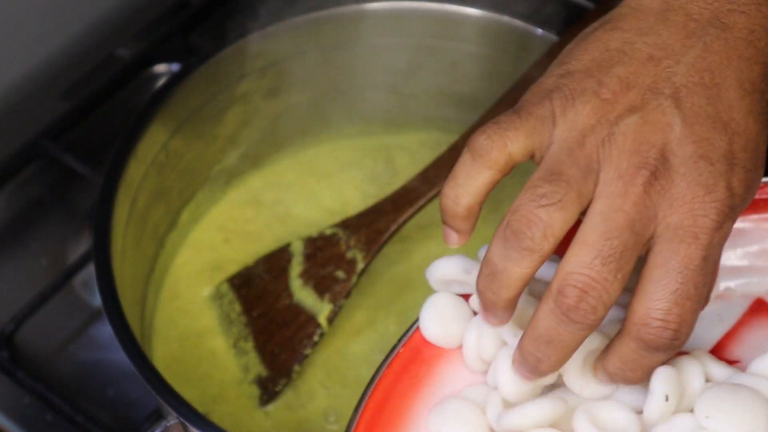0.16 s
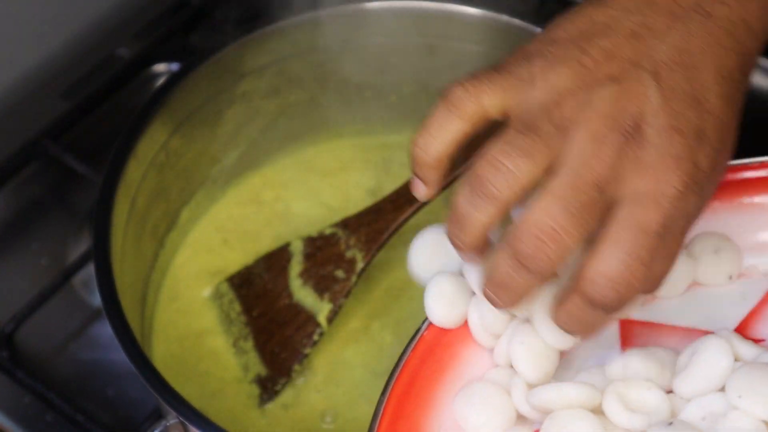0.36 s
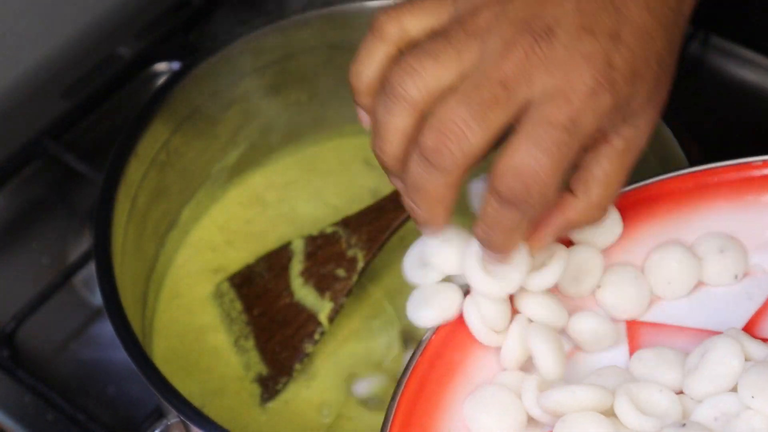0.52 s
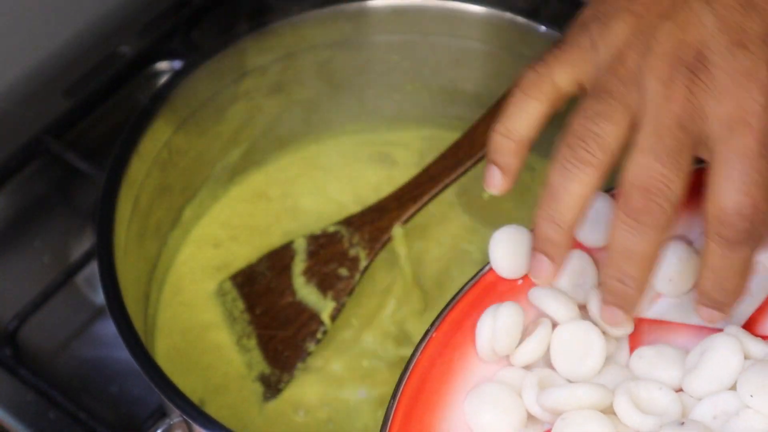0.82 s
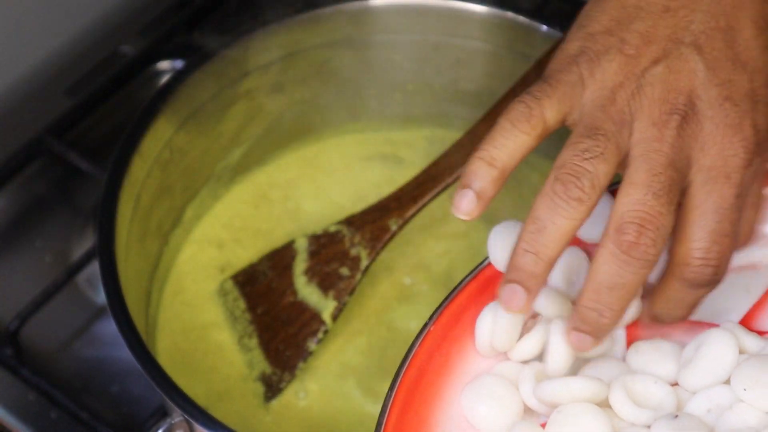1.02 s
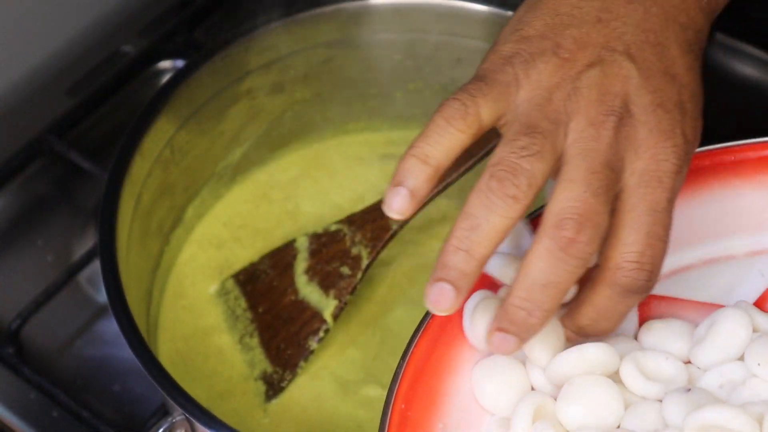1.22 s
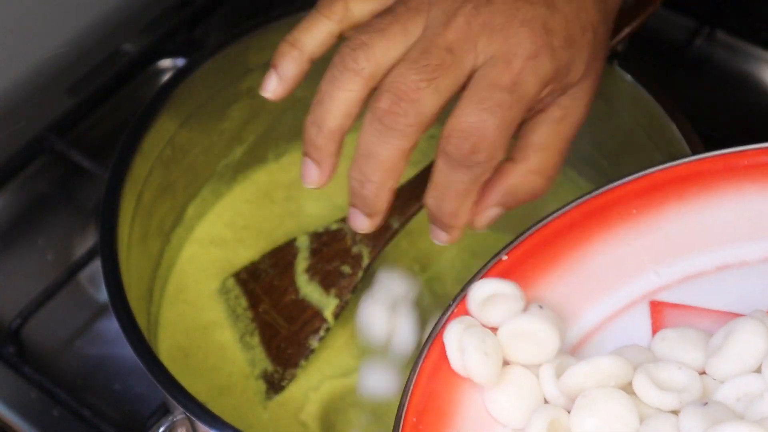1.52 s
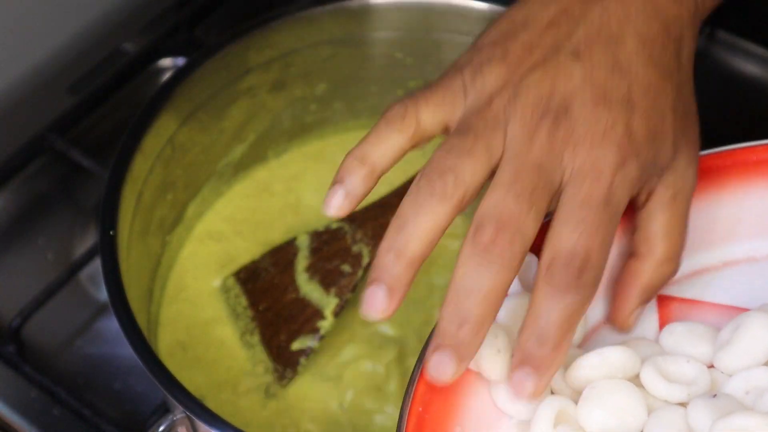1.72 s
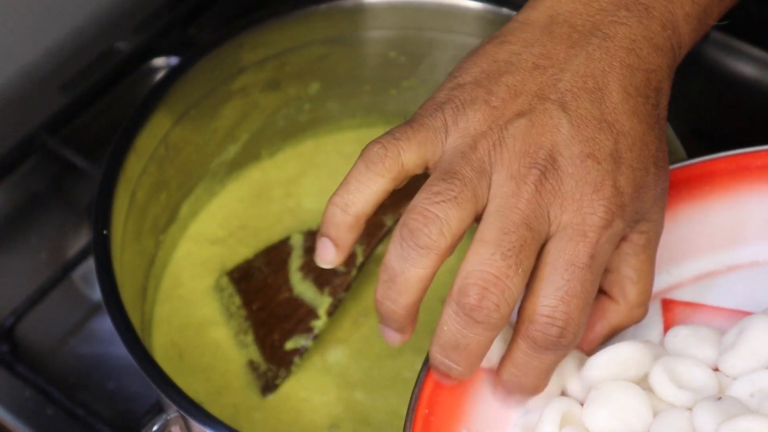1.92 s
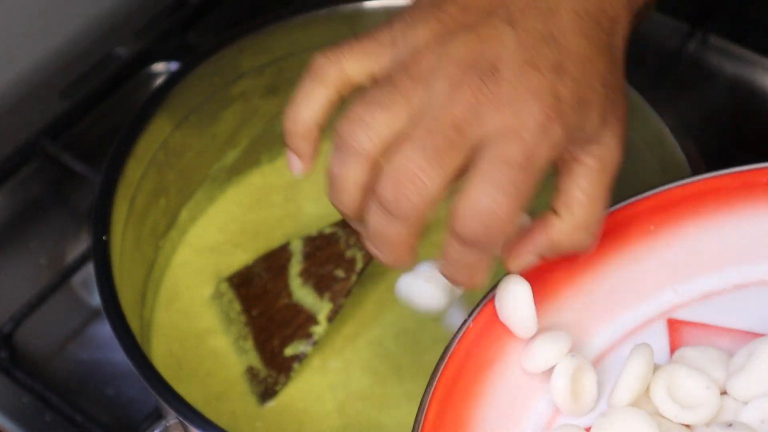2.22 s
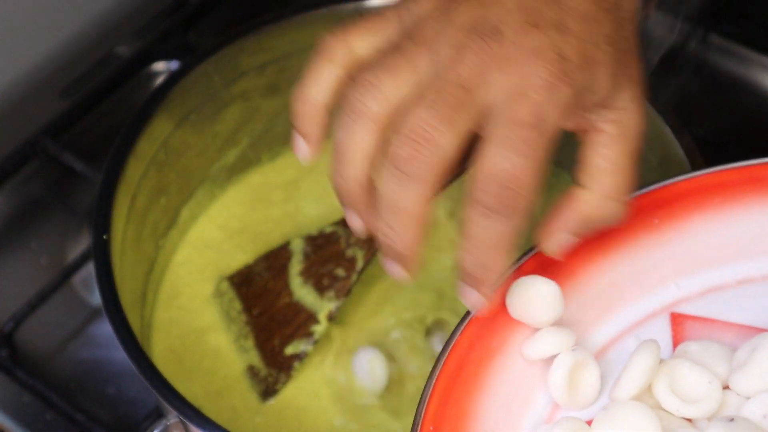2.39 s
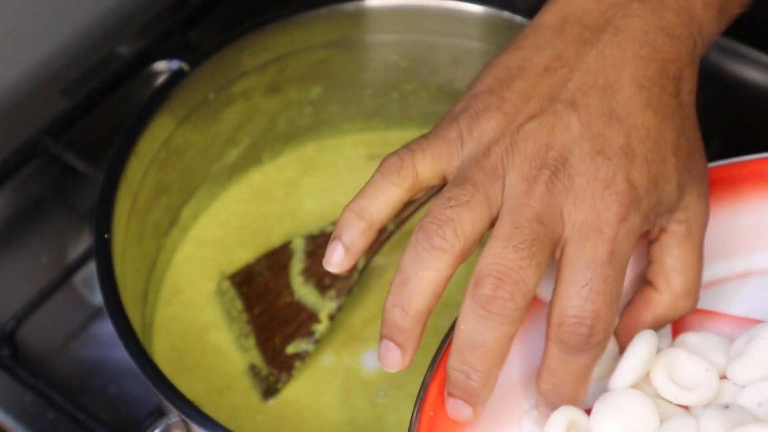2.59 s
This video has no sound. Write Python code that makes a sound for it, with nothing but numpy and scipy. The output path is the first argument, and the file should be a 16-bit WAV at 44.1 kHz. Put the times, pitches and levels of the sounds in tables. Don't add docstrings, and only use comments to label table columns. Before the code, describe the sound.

Small dough balls splash and plop into a simmering pot over a steady gas burner hiss

```python
import sys
import numpy as np
from scipy import signal
from scipy.fft import rfft, irfft, next_fast_len
from scipy.io import wavfile
from scipy.ndimage import uniform_filter1d

SR = 44100
rng = np.random.default_rng(int(sys.argv[2]) if len(sys.argv) > 2 else 0)


def wrap_up_sound(samples):
    columns = np.atleast_2d(samples).T
    tamed = np.clip(columns, -1, 1)
    steps = np.round(tamed * 32767).astype(np.int16)
    wavfile.write(sys.argv[1], SR, steps)


def how_loud(loudness_db):
    steps = np.asarray(loudness_db, float) / 20
    return 10 ** steps


N = 121275

# frequency in Hz, level in dB per Hz.
FLAME_SPECTRUM = [(15, -18), (40, -5.5), (200, -8.5), (370, -10.5), (1500, -12.5), (1750, -19.5),
                  (7000, -23), (8500, -26.5)]
# frequency in Hz, level in dB per Hz.
HISS_SPECTRUM = [(8500, -26), (12500, -28.5), (16500, -36)]
# frequency in Hz, width in Hz, lift in dB.
POT_BANDS = [(73.5, 50, 6.5), (159.6, 26, 5.5), (450, 21.3, 7.5), (528, 49, 5), (1336, 33, 5.5),
             (1570, 360, -3), (1566, 28, 7.5)]
# frequency in Hz, width in Hz, lift in dB.
JET_BANDS = [(2920, 150, 5), (5030, 100, 8), (5250, 90, 4), (6900, 220, 6), (9800, 100, 6), (11900, 150, 4),
             (12350, 120, 5)]
# frequency in Hz, level in dB, time to fade by 60 dB in seconds,
# direction of the first swing (1 or -1).
TRAY_TONES = [(300, -5.5, .06, -1), (445, -2, .034, -1), (523, -3, .039, 1), (715, -11, .06, 1),
              (799, 2.5, .022, 1), (942, 1, .024, -1), (1222, -3.5, .012, -1), (2190, -15.5, 0.023, 1),
              (3550, -21, .07, 1), (5600, -16, 0.034, 1)]
# start in seconds, peak in dB, pitch in Hz.
PLOPS = [(.406, -46, 530), (.479, -48, 503), (.541, -39, 496), (0.6335, -34, 530), (.688, -39, 476),
         (0.748, -27.5, 483), (0.807, -31, 470), (0.854, -28.5, 536), (0.919, -40, 434), (1.015, -31, 450),
         (1.054, -38, 530), (1.163, -36.5, 528), (1.24, -39, 600), (1.33, -40, 476), (1.576, -32, 464),
         (1.594, -31, 494), (1.668, -31, 540), (1.6755, -24.5, 540) , (1.764, -35, 532), (1.812, -41, 510),
         (1.935, -32.5, 485), (2.002, -32, 526), (2.081, -32, 450),
         (2.148, -31.5, 520) , (2.241, -35.5, 506), (2.294, -42, 440), (2.323, -42, 515), (2.405, -35, 437),
         (2.442, -32, 507), (2.453, -40, 450), (2.472, -35, 436), (2.493, -35, 490), (2.498, -33.5, 520)]
# start in seconds, length in seconds, level in dB, pitch in Hz.
WHISTLES = [
    (1.9, 0.057, -52, 1540),
    (1.7, 0.063, -57, 1200),
    (2.21, 0.057, -59, 1400),
    (2.53, .16, -54.5, 1560),
    (2.64, 0.051, -52, 1300),
    (1.04, .12, -57, 1560),
    (.42, 0.098, -57.5, 1500),
]
# start in seconds, peak in dB, spray pitch in Hz, spray fade in seconds.
SPLASHES = [(0.467, -30, 5850, .004), (.587, -28, 5460, 0.0044), (0.597, -35, 2340, 0.0031),
            (0.609, -27, 6780, 0.0065), (0.635, -27, 5850, .007), (0.661, -30.5, 5600, .008),
            (0.748, -26, 6040, 0.0036), (0.776, -30, 6000, 0.0093), (0.791, -24.5, 4000, 0.0075),
            (0.81, -19, 6000, 0.0075), (0.8555, -21, 4000, 0.0067), (.874, -25.5, 4130, 0.0043),
            (0.887, -33, 5240, 0.0074), (1.454, -28.5, 7400, .007), (1.494, -27, 5690, .006),
            (1.52, -29.5, 7200, 0.0068), (1.579, -23, 6280, 0.0055), (1.597, -29.5, 4870, .005),
            (1.629, -25.5, 8600, 0.008), (1.669, -25, 6800, 0.0084), (1.677, -21.5, 5400, 0.014),
            (1.727, -33, 4380, 0.0033), (1.76, -32, 2420, .004), (1.766, -25, 8430, 0.0043),
            (1.817, -26.5, 4410, 0.0062), (2.08, -35.5, 1905, .004), (2.398, -33.5, 4320, 0.005),
            (2.4416, -18, 5760, 0.0077), (2.615, -27, 6560, .005)]
# frequency in Hz, gain in dB.
SOFT_TOP = [(6500, -0.5), (8500, 1.5), (12000, -2.5), (15000, -5)]
ROLL_STARTS = [.58, .70, .86, .93, 1.02, 1.04, 1.112, 1.153, 1.95, 2.43, 2.44, 2.54, 2.68]
# length in seconds, level in dB, pitch in Hz.
ROLLS = [(0.11, -49, 2400), (0.029, -54.5, 3000), (0.074, -46.5, 4500), (0.087, -50, 4970),
         (.13, -46.5, 680), (0.11, -47.5, 5060), (0.029, -43.5, 4400), (.015, -48, 5440),
         (0.059, -50, 3500), (.1, -41, 4950), (0.055, -54, 2100), (0.078, -47, 6230), (.05, -51, 9200)]
# frequency in Hz, width in Hz, lift in dB.
TRAY_BANDS = [(2800, 630, 0), (3440, 120, 4.5), (4400, 460, 3), (5240, 120, -1.5), (5400, 130, 8),
              (6730, 73, 11), (7700, 180, 4.5)]
TAP_STARTS = [.5878, .5960, .5975, .6095, .6335, .6336, .6615, .667, .7485, .7908, .7945, .8092, .8092,
              .8097, .820, .8328, .8555, .8556, .8570, .8620, .8745, .8900, .8945, 1.4942, 1.5795, 1.5795,
              1.6675, 1.6675, 1.6765, 1.6775, 1.6815, 1.7257, 1.7601, 1.7645, 1.7665, 1.8175, 2.082, 2.083,
              2.4420, 2.4425, 2.4480, 2.474, 2.4745]
# peak in dB, pitch in Hz, time to fade by 60 dB in seconds.
TAPS = [(-35, 4250, 0.017), (-30, 1930, 0.0095), (-33.5, 1130, 0.014), (-33, 6700, 0.026),
        (-28, 5640, .012), (-28.5, 800, 0.012), (-34, 5300, .015), (-35, 5600, .015), (-33, 5000, .015),
        (-29, 890, 0.0056), (-33.5, 2340, 0.047), (-24, 950, 0.012), (-24.5, 2400, 0.016),
        (-23, 6000, 0.021), (-30, 2300, 0.026), (-29, 880, .008), (-23, 4260, 0.011), (-28, 1980, 0.02),
        (-27, 1290, .02), (-27, 5000, 0.019), (-32, 4230, .015), (-29, 5200, .012), (-31, 4000, .012),
        (-31, 5430, 0.023), (-27, 7100, 0.018), (-36.5, 1960, 0.017), (-31, 2300, 0.018), (-32, 5900, .01),
        (-33, 6800, 0.014), (-32, 850, .02), (-30, 2200, 0.014), (-26.5, 4290, 0.017), (-36, 2500, 0.024),
        (-29, 2500, .02), (-32, 890, 0.014), (-33, 4300, .015), (-35.5, 990, 0.042), (-38.5, 1800, 0.023),
        (-29, 5200, .03), (-34, 900, .015), (-31, 6240, .015), (-36, 3300, 0.041), (-33, 800, .012)]
# frequency in Hz, gain over the right port in dB.
LEFT_PORT = [(3800, 0), (5000, 6.5), (7000, 5.5), (8200, 0.5), (11500, 0.5), (12500, 2), (14000, 2)]
# frequency in Hz, gain in dB.
SUM_COLOUR = [(1500, 1.5), (2500, -0.5), (7000, -3.5), (8000, -12), (8900, -12), (9800, -7.5), (12300, -1),
              (15000, -3)]
# frequency in Hz, gain in dB.
DIFFERENCE_COLOUR = [(25, -40), (60, -35), (200, -7.5), (500, -6), (1000, -4), (1500, 2)]
# frequency in Hz, gain in dB.
TOP_LIMIT = [(12600, 0.5), (13500, -9), (15000, -2), (15900, -38), (16050, -70)]


def unit(x):
    return x / np.sqrt(np.mean(x ** 2) + 1e-20)


def along(points, hz):
    f, v = np.transpose(points)
    return np.interp(np.log(hz + 1), np.log(f + 1), v)


def lifted(bands, f):
    return sum(db * np.exp(-2 * ((f - hz) / width) ** 2) for hz, width, db in bands)


def filtered(x, response):
    m = next_fast_len(x.shape[-1] + 8192)
    gain = response(np.fft.rfftfreq(m, 1 / SR))
    return irfft(rfft(x, m) * gain, m)[..., :x.shape[-1]]


def noise(length):
    return rng.standard_normal((2, length))


def band(length, hz, octaves):
    def bell(f):
        return np.exp(-.5 * (np.log2((f + 1) / hz) / octaves) ** 2)
    return unit(filtered(noise(length), bell))


def rise(t, seconds):
    return 1 - np.exp(-t / seconds)


def add(track, s, sound):
    part = track[:, round(s * SR):][:, :sound.shape[-1]]
    part += sound[:, :part.shape[-1]]


def echo(x, db, t60_s):
    t = np.arange(12000) / SR
    tail = noise(len(t)) * how_loud(-60 * t / t60_s) * (t > .002)
    tail = tail / np.linalg.norm(tail[0])
    return x + how_loud(db) * signal.fftconvolve(x, tail, axes=1)[:, :N]


def burner():
    z = signal.stft(noise(N), nperseg=512)[2]
    field = rng.standard_normal(z.shape[1:])
    field = uniform_filter1d(field, size=4, axis=0)
    field = uniform_filter1d(field, size=5, axis=1)
    flame = signal.istft(z * how_loud(0.74 * unit(field)), nperseg=512)[1][:, :N]
    spectrum = [*FLAME_SPECTRUM, *HISS_SPECTRUM[1:]]
    bands = [*POT_BANDS, *JET_BANDS]
    coloured = filtered(flame, lambda f: how_loud(along(spectrum, f) + lifted(bands, f)))
    return how_loud(-40.5) * unit(coloured)


def knock():
    start_s, level_db = .10719, -14.2
    out, t = np.zeros((2, N)), np.arange(12000) / SR
    for hz, db, t60, polarity in TRAY_TONES:
        turn = hz / 3500 * np.array([[1], [-1]])
        shape = how_loud(level_db + db - 60 * t / t60) * rise(t, .00052)
        add(out, start_s, np.sign(polarity) * shape * np.sin(2 * np.pi * hz * t + turn))
    crack = how_loud(-28 - 60 * t / 0.055) * band(len(t), 5100, 0.38)
    add(out, start_s + .001, crack)
    thud_shape = how_loud(-23.5 - 60 * t / .13) * (1 - np.exp(-(t / 0.011) ** 2))
    add(out, start_s, thud_shape * band(len(t), 640, 0.88)[:1])
    return echo(out, -9.5, 0.25)


def plops():
    t60_s, attack_s, pitch_rise = 0.052, 0.0016, 0.0088
    out, t = np.zeros((2, N)), np.arange(4000) / SR
    for s, db, hz in PLOPS:
        shape = how_loud(-60 * t / t60_s) * rise(t, attack_s)
        cycles = hz * t * (1 + pitch_rise * t / t60_s)
        ring = np.sin(2 * np.pi * (cycles + 0.1 * rng.standard_normal((2, 1))))
        slap = unit(filtered(noise(len(t)), lambda f: f / (300 + f) / (1 + (f / 1400) ** 4)))
        add(out, s, how_loud(db - 0.5) * shape * (ring + how_loud(-9.5) * slap))
    return out


def whistles():
    out = np.zeros((2, N))
    for s, length_s, db, hz in WHISTLES:
        swell = np.sin(np.linspace(0, np.pi, round(length_s * SR))) ** 0.56
        add(out, s, how_loud(db) * swell * band(len(swell), hz, 0.025)[:1])
    return out


def spray(delays_s, pitch_hz, fade):
    pitch_spread, cycles, pitch_rise, size_db = 0.346, 5.8, 0.084, 2
    count = len(delays_s)
    hz = pitch_hz * np.exp(pitch_spread * rng.standard_normal((count, 1)))
    hz = np.clip(hz, 500, 14000)
    t = np.arange(700) / SR
    life = hz * t / cycles
    size = fade[:, None] * how_loud(size_db * rng.exponential(size=(count, 1)))
    phase = 2 * np.pi * (hz * t * (1 + pitch_rise * life) + rng.random((2, count, 1)))
    grains = size * life * np.exp(-2 * life) * np.sin(phase)
    at = (delays_s[:, None] * SR).astype(int) + np.arange(len(t))
    return np.array([np.bincount(at.ravel(), port.ravel()) for port in grains])


def splashes():
    out, t = np.zeros((2, N)), np.arange(2500) / SR
    for s, db, hz, fade_s in SPLASHES:
        delays = 2 * fade_s * rng.random(90) ** 1.6
        bubbles = spray(delays, hz, np.exp(-delays / fade_s))
        snap = band(len(t), hz, 5.7) * np.exp(-t / fade_s) * rise(t, 0.0024)
        click = band(len(t), 0.46 * hz, 1.5) * np.exp(-t / 0.00046) * rise(t, 0.00026)
        add(out, s, how_loud(db) * bubbles / np.abs(bubbles).max())
        add(out, s, how_loud(db - 3.5) * snap)
        add(out, s, how_loud(db - 16.5) * click)
    return filtered(out, lambda f: how_loud(along(SOFT_TOP, f)))


def rolls():
    out = np.zeros((2, N))
    for s, (length_s, db, hz) in zip(ROLL_STARTS, ROLLS):
        place = rng.random(300)
        crackle = unit(spray(place * length_s, hz, np.sin(np.pi * place ** 0.39)))
        swell = np.sin(np.pi * np.linspace(0, 1, crackle.shape[1]) ** 0.74)
        rustle = swell * band(len(swell), hz, 1.0)
        add(out, s, how_loud(db) * (crackle + 2.0 * rustle))
    return filtered(out, lambda f: how_loud(lifted(TRAY_BANDS, f) - 3.5))


def taps():
    out, t = np.zeros((2, N)), np.arange(3000) / SR
    for s, (db, hz, t60) in zip(TAP_STARTS, TAPS):
        turn = .5 * rng.standard_normal((2, 2, 1))
        main = np.sin(2 * np.pi * hz * t + turn[0])
        partner = 0.33 * np.sin(2 * np.pi * 1.4 * hz * t + turn[1])
        rasp = how_loud(-7) * band(len(t), hz, 0.32)
        shape = how_loud(db - 60 * t / t60) * rise(t, 0.00061)
        add(out, s, shape * (main + partner + rasp))
    return out


def scene():
    in_pot = echo(splashes() + taps(), -12, .1)
    return burner() + knock() + plops() + whistles() + in_pot + rolls()


def low_pass(x):
    return signal.sosfilt(signal.butter(12, 15960, fs=SR, output="sos"), x)


def record(dry):
    left = filtered(dry[0], lambda f: how_loud(along(LEFT_PORT, f) / 2))
    right = filtered(dry[1], lambda f: how_loud(-along(LEFT_PORT, f) / 2))
    mid = filtered(left + right, lambda f: how_loud(along(SUM_COLOUR, f) + along(TOP_LIMIT, f)) / 2)
    side = filtered(left - right, lambda f: how_loud(along(DIFFERENCE_COLOUR, f) + along(TOP_LIMIT, f)) / 2)
    return low_pass(np.array([mid + side, mid - side]))


dry = scene()
out = record(dry)
wrap_up_sound(out)
```